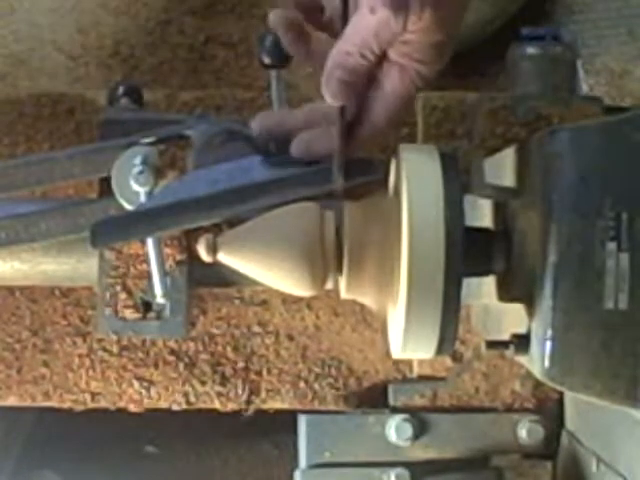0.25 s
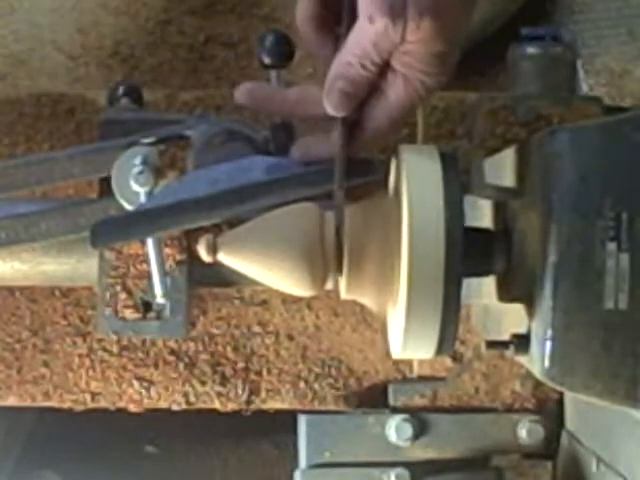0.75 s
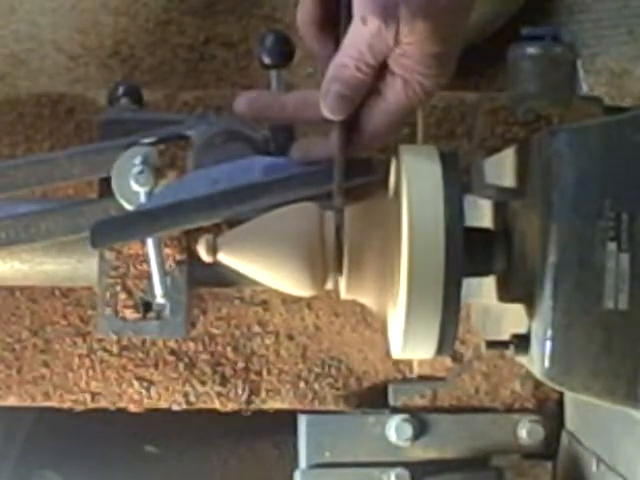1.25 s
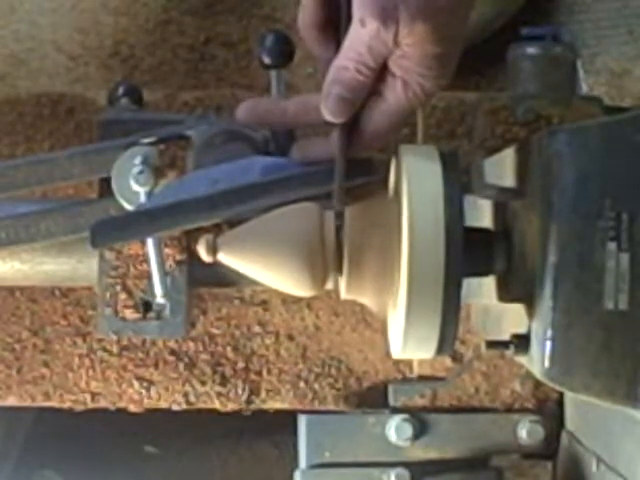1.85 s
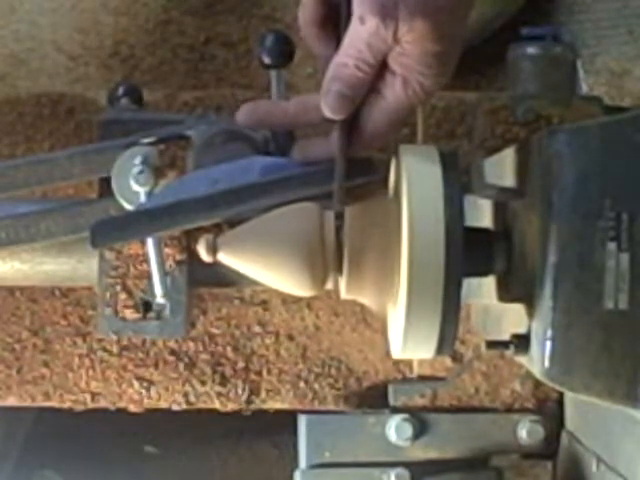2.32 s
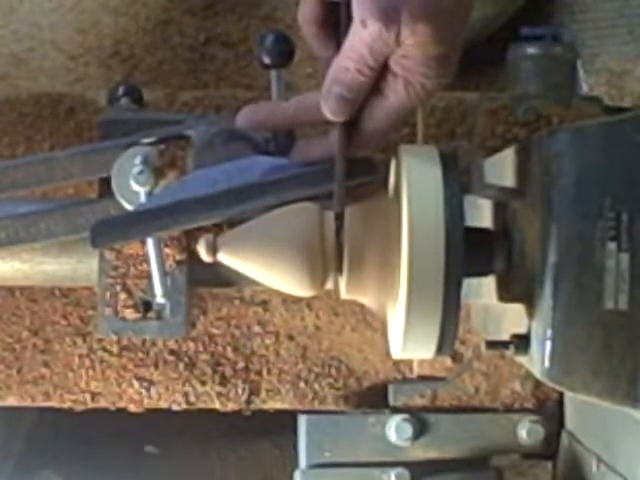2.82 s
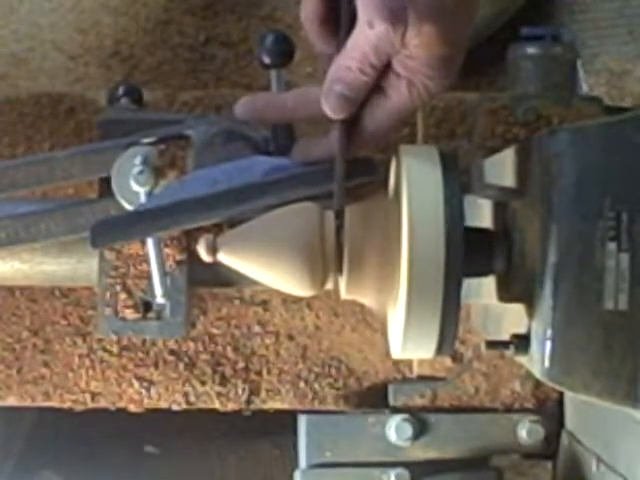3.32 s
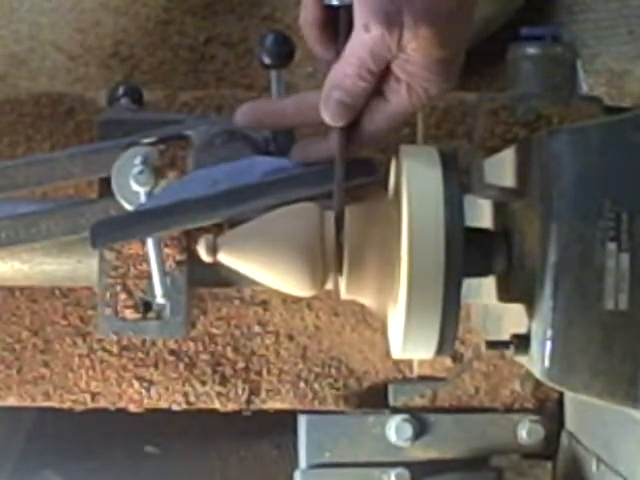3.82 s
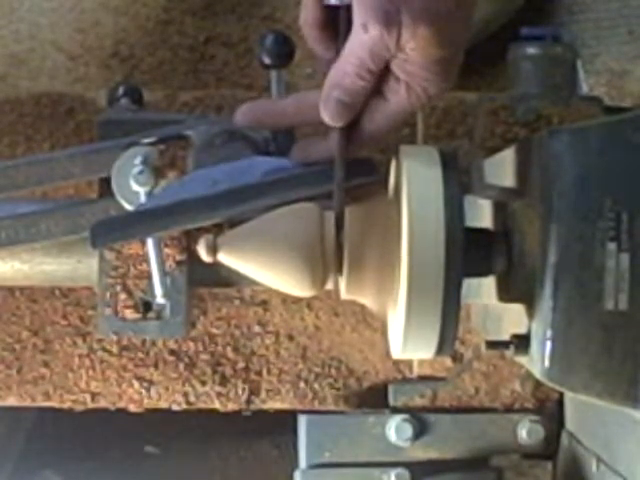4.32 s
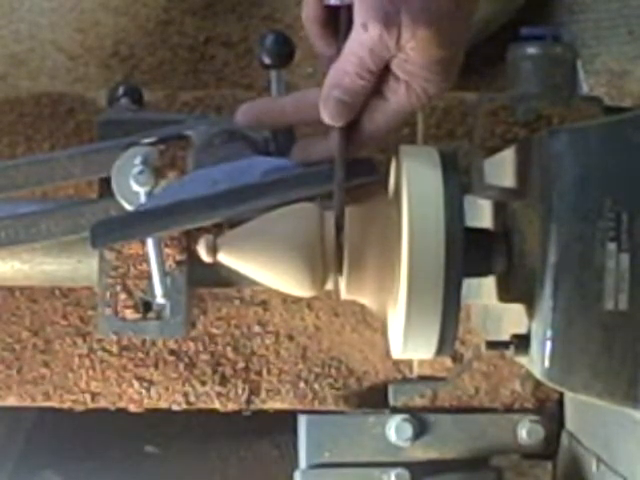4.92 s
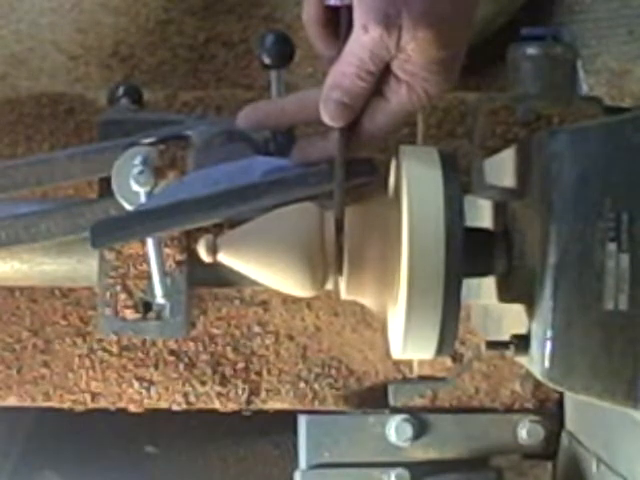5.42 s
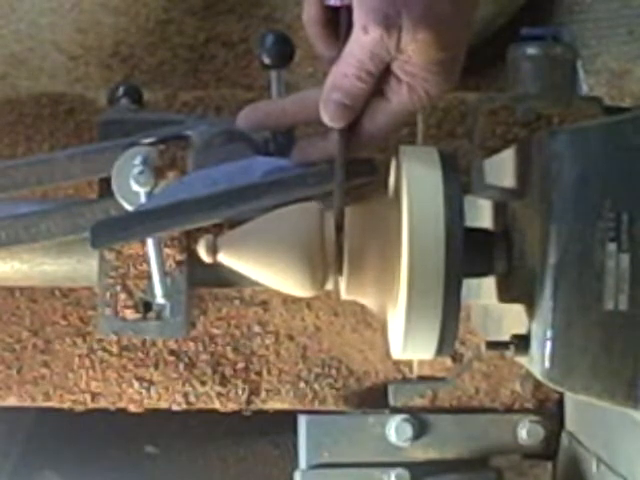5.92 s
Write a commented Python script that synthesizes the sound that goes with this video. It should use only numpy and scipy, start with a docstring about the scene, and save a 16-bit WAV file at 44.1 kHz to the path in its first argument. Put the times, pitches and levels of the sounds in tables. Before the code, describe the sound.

A lathe motor throbs several times for each lap of its belt, over soft mechanical rumble. A cutting edge touches the wood, skips, then tears fibres in a harsh rapid-fluttering hiss with metallic ringing. The scrape falls to a light rub for a moment, then returns as a sustained rasp with strengthening low growl and shudder. Small workshop, nearby narrow-band microphone, mono.

```python
"""In a small workshop a belt-driven wood lathe runs; its motor hums and throbs with each lap of the belt.
A thin parting tool is fed into the spinning wood, eased off for a moment, then fed in deeper.
The edge meets nearly the same grain on every turn, so filtered noise that almost repeats makes the hiss
flutter at the spindle rate, and tones at multiples of that rate make the growl. The blade also rings and squeaks."""
import sys
import numpy as np
from scipy import signal
from scipy.fft import rfft, irfft, next_fast_len
from scipy.io import wavfile
from scipy.ndimage import map_coordinates

SR = 44100
rng = np.random.default_rng(int(sys.argv[2]) if len(sys.argv) > 2 else 0)


def store_pcm(level_fs):
    """Save levels as 16-bit WAV."""
    pcm = np.round(np.clip(level_fs, -1, 1) * 32767).astype(np.int16)
    wavfile.write(sys.argv[1], SR, np.atleast_2d(pcm).T)


N = 271656


def from_db(db):
    """Turn decibels into gain."""
    return 10 ** (np.asarray(db) / 20)


def rms_one(x):
    """Scale to unit power."""
    return x / np.sqrt(np.mean(x ** 2) + 1e-20)


def in_time(rows):
    """Make one curve per column after the time, joined by straight lines."""
    s, *columns = np.transpose(rows)
    return [np.interp(np.arange(N) / SR, s, column) for column in columns]


def drift(rate_hz):
    """Slow random wandering with a spread of one, made by smoothing noise."""
    step = 40   # samples between the slow values
    pole = np.exp(-2 * np.pi * rate_hz * step / SR)
    noise = rng.standard_normal(N // step + 2002)
    slow = signal.lfilter([1], [1, -2 * pole, pole * pole], noise)[2000:]   # drop the filter's start-up
    return np.interp(np.arange(N) / step, np.arange(len(slow)), rms_one(slow))


def coloured(x, spectrum, resonances=()):
    """Filter x by a smooth spectrum with resonant peaks or dips on it; unit power."""
    size = next_fast_len(N + 4096)
    hz = np.maximum(np.fft.rfftfreq(size, 1 / SR), 1)
    points, levels = np.transpose(spectrum)
    db = np.interp(np.log(hz), np.log(points), levels, left=-np.inf, right=-np.inf)
    for centre, width, lift in resonances:
        db = db + lift / (1 + (2 * (hz - centre) / width) ** 2)
    return rms_one(irfft(rfft(x, size) * from_db(db), size)[:N])


def ringing(hz, width_hz):
    """A randomly shaken resonance: a tone whose strength and phase wander."""
    phase = 2 * np.pi * np.cumsum(hz * np.ones(N)) / SR
    return rms_one(drift(width_hz) * np.cos(phase) + drift(width_hz) * np.sin(phase))


def surface(turns, memory, count):
    """Roughness at count places round a turning part; each turn keeps a share of the last."""
    keep = np.clip(memory, 0, .995)
    laps = rng.standard_normal((int(turns[-1]) + 2, count))
    for k in range(1, len(laps)):
        laps[k] = keep * laps[k - 1] + np.sqrt(1 - keep ** 2) * laps[k]
    return rms_one(map_coordinates(laps.ravel(), [turns * count], order=3, mode="nearest"))


def spindle_tone(turns, multiple, unsteady):
    """A tone at a multiple of the spindle rate; it changes as the wood is pared away."""
    phase = 2 * np.pi * (multiple * turns + rng.random())
    return (1 + unsteady * drift(1.65)) * np.cos(phase) + unsteady * drift(1.2) * np.sin(phase)


# the belt laps steadily, and slips back once as the first cut bites hardest
BELT_LAPS_PER_S, BELT_JOINT_S = 5.967, -.0095
SLIP_FROM_S, SLIP_TO_S, SLIP_LAPS = 2.35, 2.8, .67


def belt_laps():
    """Laps of the belt, counted from a passing of its joint."""
    t = np.arange(N) / SR
    slipped = np.interp(t, [SLIP_FROM_S, SLIP_TO_S], [0, SLIP_LAPS])
    return BELT_LAPS_PER_S * (t - BELT_JOINT_S) - slipped


MAINS_HZ = 60
STEADY_HUM_DB = -28   # fourth multiple of the mains, with the belt fully taut
TUG_SPREAD_DB = 1.65   # chance difference between tugs
# weaker magnetic hum and belt sidebands: (multiple of the mains, belt order, mean level [dB rms])
HUM = [(1, 0, -61), (2, -3, -45), (2, 0, -47.5), (2, 3, -52.5), (4, -8, -45), (4, -2, -53.5), (4, 2, -44),
       (4, 3, -52)]
# stiff places in the belt tug on the motor on every lap: (place in the lap [0-1], typical hum level [dB])
TUGS = [(.318, -21), (.679, -23.6), (0.977, -24)]


def motor(turns, slack, waver=0.082, surge_s=0.038, surge_hz=237):
    """Hum at multiples of the mains; a slack belt breaks it into surges, a taut one lets it run evenly."""
    t, laps = np.arange(N) / SR, belt_laps()
    hum_hz = 4 * MAINS_HZ
    hum = (1 - slack) * from_db(STEADY_HUM_DB) * np.cos(2 * np.pi * hum_hz * t)
    for multiple, belt_order, db in HUM:
        level = from_db(db) * (1 + waver * drift(1.8))
        hum = hum + level * np.cos(2 * np.pi * (multiple * MAINS_HZ * t + belt_order * laps))
    # a tug swings the housing, tuned just under the hum; it is in step with the hum at the top of the surge
    for lap in range(int(laps[-1]) + 1):
        for place, db in TUGS:
            s = np.interp(lap + place, laps, t, right=np.inf)
            near = np.abs(t - s) < surge_s
            lag = t[near] - s
            strength = from_db(db + TUG_SPREAD_DB * rng.standard_normal())
            swell = strength * np.cos(np.pi / 2 * lag / surge_s) ** 2
            hum[near] += slack[near] * swell * np.cos(2 * np.pi * (hum_hz * s + surge_hz * lag))
    return np.sqrt(2) * hum   # levels are rms


# colour of the belt rumble: (frequency [Hz], relative level [dB per Hz])
RUMBLE = [(12, -68), (20, -23), (75, -23), (107, -21.5), (166, -22), (238, -12.5), (270, -18.5), (576, -26),
          (630, -25), (690, -20), (728, -30.5), (797, -28.5), (1500, -43.5), (1950, -68), (3300, -120)]
# colour of the bearing hiss: (frequency [Hz], relative level [dB per Hz])
BEARINGS = [(590, -35), (1000, -6.5), (1100, -7.5), (1200, -3.5), (1600, -11), (2500, -6.5), (3200, -10.5),
            (4100, -2), (4970, -5), (5710, -10.5), (6790, -6.5), (7860, -19.5), (8620, -29), (8940, -45.5),
            (11600, -72), (19700, -120)]
# headstock and motor housing resonances: (frequency [Hz], width [Hz], level [dB rms])
HOUSING = [(233.5, 27, -34.5), (440, 27, -58), (587, 12, -50.5), (691, 20, -49.5), (801, 18, -51.5),
           (7600, 40, -61.5), (8370, 40, -76)]


def headstock(turns, rumble_db=-38, bearings_db=-39.5, flutter_db=1.0):
    """Belt rumble and bearing hiss from filtered noise, and the ringing of the castings."""
    dip = (226.4, 43, -14.0)   # Hz, width Hz, dB
    rumble = from_db(rumble_db) * coloured(rng.standard_normal(N), RUMBLE, [dip])
    flutter = from_db(flutter_db * surface(turns, memory=0.41, count=12))
    rolling = rng.standard_normal(N) * flutter
    bearings = from_db(bearings_db) * coloured(rolling, BEARINGS)
    castings = sum(from_db(db) * ringing(hz, width / 2) for hz, width, db in HOUSING)
    return rumble + bearings + castings


# the blade sings faintly in the shallow cut, shakily until it settles on one note:
# (time [s], pitch [Hz], level [dB], shaky part as a multiple of the held part)
SING = [(1.52, 2500, -65, 3), (1.57, 2300, -44, 3), (1.66, 1650, -39, 2), (2.0, 1660, -42, 1.5),
        (2.4, 1770, -44, .8), (2.75, 1783, -40, .5), (3.03, 1788, -36.5, .5), (3.12, 1790, -68, .5)]


def squeak(turns, touching, end_grain_db=7):
    """The blade squeaks each time end grain passes the edge, twice a turn: a held note with a shaky part."""
    hz, db, shaky = in_time(SING)
    passes = rms_one(from_db(end_grain_db * np.cos(2 * np.pi * 2 * turns)))
    held = np.sqrt(2) * np.cos(2 * np.pi * np.cumsum(hz) / SR)
    note = (held + shaky * ringing(hz, width_hz=26)) / np.hypot(1, shaky)
    return touching * from_db(db) * passes * note


# the blade rings up as the shallow cut bears harder: (time [s], level [dB])
RING_UP = [(1.5, -78), (1.75, -37), (2.05, -38), (2.3, -24), (2.7, -30.5), (2.9, -28), (3.02, -22.5),
           (3.15, -65)]
# the modes that ring up: (multiple of the spindle rate, relative level [dB])
RING_MODES = [(99, -16), (132, -12), (169, -4), (195, -13), (209, -6)]


def blade_ring(turns, speed, locked_db=0, loose_db=-2):
    """Under pressure the blade rings: partly in step with the wood, partly at random."""
    ring_db, = in_time(RING_UP)
    ring = 0
    for multiple, db in RING_MODES:
        locked = from_db(locked_db) * spindle_tone(turns, multiple, unsteady=0.31)
        loose = from_db(loose_db) * ringing(multiple * speed, width_hz=29)
        ring = ring + from_db(db) * (locked + loose)
    return from_db(ring_db) * ring


FULL_SHUDDER_DB = -33   # shudder level at full cut
# the thrum follows the shudder: level at full cut, dB per dB
THRUM_DB, THRUM_FOLLOWS = -28.5, 1.35
# the growl is mostly tone, with some loose wood noise
CHATTER_WIDTH_HZ, TONE_DB, WOOD_DB = 28, -.3, -6.5
# force on the workpiece, before the trims: (time [s], growl level [dB], shudder level [dB])
LOAD = [(1.52, -44, -47), (1.58, -55, -62), (1.77, -40, -43.5), (1.88, -37, -49), (2.46, -29.5, -34),
        (3.01, -33, -41), (3.19, -55, -57), (3.38, -39.5, -48.5), (3.48, -47, -60.5), (3.62, -32, -39),
        (4.7, -27.5, -37), (5.09, -30, -34), (6.09, -26.5, -33), (6.1, -28, -33.5)]
# the chatter resonance shifts with the tool's grip on the wood: (time [s], frequency [Hz], lift [dB])
CHATTER_PITCH = [(3.0, 537, 9), (3.6, 540, 6), (4.0, 574, 10), (4.8, 592, 10), (5.05, 603, 6),
                 (5.3, 535, 6), (5.6, 535, 7), (5.9, 600, 3), (6.16, 535, 6)]
# chatter of the workpiece against the edge: (multiple of the spindle rate, relative level [dB])
GROWL = [(17, -13), (18, -15), (19, -14), (20, -10), (21, -13), (22, 0), (23, -5), (24, -3), (25, -8),
         (26, -16), (27, -8), (28, -8), (32, -13), (36, -14), (40, -16), (42, -16)]
# slow flexing of the workpiece: (multiple of the spindle rate, relative level [dB])
THRUM = [(4, -15.5), (8, -1), (10, -3.5)]
# fast shudder of the workpiece: (multiple of the spindle rate, relative level [dB])
SHUDDER = [(11, -12), (13, -14.5), (14, -5.5)]
# colour of the loose wood noise: (frequency [Hz], relative level [dB per Hz])
WOOD = [(150, -23), (200, -4.5), (280, -3), (380, -9.5), (470, -0.5), (560, 6.5), (650, 2.5), (760, -10.5),
        (950, -21.5), (1200, -21)]


def flexing_tones(turns, orders):
    """The wood flexes at several multiples of the spindle rate; their sum has unit power."""
    return rms_one(sum(from_db(db) * spindle_tone(turns, multiple, unsteady=0.11) for multiple, db in orders))


def workpiece(turns, speed, touching, growl_trim_db=3.0, shudder_trim_db=0.5):
    """The uneven cutting force shakes wood and chuck at multiples of the spindle rate."""
    growl_db, shudder_db = in_time(LOAD)
    thrum_db = THRUM_DB + THRUM_FOLLOWS * (shudder_db - FULL_SHUDDER_DB)
    centre_hz, lift_db = in_time(CHATTER_PITCH)
    growl, power = 0, 0
    for multiple, db in GROWL:
        near = 1 / (1 + (2 * (multiple * speed - centre_hz) / CHATTER_WIDTH_HZ) ** 2)
        gain = from_db(db + lift_db * near)   # harmonics near the resonance are lifted
        growl = growl + gain * spindle_tone(turns, multiple, unsteady=0.14)
        power = power + gain ** 2
    thrum = from_db(thrum_db) * flexing_tones(turns, THRUM)
    shudder = from_db(shudder_db + shudder_trim_db) * flexing_tones(turns, SHUDDER)
    wood = coloured(surface(turns, memory=0.25, count=200), WOOD)
    chatter = from_db(TONE_DB) * growl / np.sqrt(power) + from_db(WOOD_DB) * wood
    return touching * (from_db(growl_db + growl_trim_db) * chatter + thrum + shudder)


def edge_bite(turns, grain_db=.9, end_grain_db=.75, fibre_db=1.4, belt_db=.8, grip_db=.3):
    """How hard the edge bites: hard and soft grain come round on every turn, belt and hand add unrest."""
    grain = grain_db * surface(turns, memory=0.89, count=10)
    end_grain = end_grain_db * np.cos(2 * np.pi * 2 * turns)
    fibres = fibre_db * surface(turns, memory=.88, count=70)
    tug = belt_db * np.cos(2 * np.pi * 3 * belt_laps())
    return rms_one(from_db(grain + end_grain + fibres + tug + grip_db * drift(23)))


FULL_FEED_DB = -20   # hiss level at full cut
# below this feed the edge begins to rub instead of cutting; this much lower it only rubs
CUTTING_DB, RUBBING_RANGE_DB = -20, 11
# the rasp follows the feed and grows in the groove: level at full cut, dB per dB, dB more when fully buried
RASP_DB, RASP_FOLLOWS, RASP_BURIED_DB = -33, 0.64, 2.5
# how hard the tool is fed in, as the level of its hiss before a small trim: (time [s], level [dB])
FEED = [(1.52, -28.5), (1.66, -28.5), (1.74, -19.5), (2.04, -21), (2.2, -20), (2.45, -19.0), (2.76, -21),
        (2.88, -19), (3.02, -21), (3.15, -39.0), (3.24, -34.0), (3.5, -33), (3.56, -24.5), (3.8, -26.5),
        (3.86, -23.5), (4.85, -21), (5.45, -20.0), (6.16, -21)]
# the blade sinks into its groove during the second push: (time [s], buried share [0-1])
GROOVE = [(3.05, 0), (3.85, 0.83)]
# colour of the coarse rasp: (frequency [Hz], relative level [dB per Hz])
RASP = [(470, -32.5), (800, -5.5), (822, -6.5), (1000, -5), (1450, -9), (1560, -3.5), (1730, -2),
        (2120, -6.5), (2350, -0.5), (2720, -11), (3000, -10.5), (3900, -25.5), (6600, -120)]
# colours of the hiss, in a shallow cut, in a deep cut and when only rubbing:
# each (frequency [Hz], relative level [dB per Hz])
SHALLOW_HISS = [(1590, -34), (2700, -16), (3040, -10), (3150, -5.5), (3420, -7), (3990, 0), (4240, -3.5),
                (4350, -2.5), (5150, -2), (5500, -8), (6990, -9), (8090, -24.5), (8940, -42),
                (11600, -70.5), (19700, -120)]
DEEP_HISS = [(1590, -32), (2700, -20), (2940, -23), (3170, -5.5), (3380, -10), (3670, -3), (3990, -2.5),
             (4320, -5.5), (4930, -6.5), (5700, -9.5), (7100, -9.5), (7930, -20.5), (8940, -40),
             (11600, -62.5), (19700, -120)]
RUB_HISS = [(1590, -51), (2700, -14), (3080, -11.5), (3330, -2), (3700, -0.5), (4320, -4), (4830, -1),
            (5470, -11), (6140, -8), (6990, -14.5), (7970, -24.5), (8940, -44.5), (11600, -71),
            (19700, -120)]
# resonances of the blade, and dips from reflections off nearby surfaces, before scaling:
# (frequency [Hz], width [Hz], lift [dB])
BLADE = [(1620, 40, 3.5), (2020, 25, 4), (2415, 50, 5), (3228, 35, 5), (3330, 60, -3), (3555, 30, 4),
         (3622, 30, 3), (3838, 30, 4), (4130, 35, 5), (4450, 70, -5), (4560, 40, 2), (4777, 35, 4),
         (4890, 50, -3), (4970, 30, 3), (5093, 40, 4.5)]


def shaving(turns, speed, touching, hiss_trim_db=-0.05):
    """Fibres tear at the edge and ring the blade: wood roughness filtered into hiss and rasp."""
    hiss_db, = in_time(FEED)
    depth, = np.clip(in_time(GROOVE), 0, 1)
    rasp_db = RASP_DB + RASP_FOLLOWS * (hiss_db - FULL_FEED_DB) + RASP_BURIED_DB * depth
    rubbing = np.clip((CUTTING_DB - hiss_db) / RUBBING_RANGE_DB, 0, 1)
    bite = edge_bite(turns)
    tearing = bite * surface(turns, memory=0.56, count=1800)   # fine roughness is soon cut away
    coarse = bite * surface(turns, memory=0.69, count=500)
    # the walls of the groove damp the blade's hiss as it sinks in;
    # in a light rub the coarse rasp rings more freely, while the fine hiss stays damped
    damped, pressed, free = (np.array(BLADE) * [1, 1, share] for share in (.8, 1.05, 1.5))
    shallow = coloured(tearing, SHALLOW_HISS, pressed)
    deep = coloured(tearing, DEEP_HISS, damped)
    cut = (1 - depth) * shallow + depth * deep
    hiss = (1 - rubbing) * cut + rubbing * coloured(tearing, RUB_HISS, damped)
    rasp = (1 - rubbing) * coloured(coarse, RASP, damped) + rubbing * coloured(coarse, RASP, free)
    scrape = from_db(hiss_db + hiss_trim_db) * hiss + from_db(rasp_db) * rasp
    return touching * (scrape + bite * blade_ring(turns, speed))


# the spindle slows a little under load: idle rate, and the sag at full shudder
IDLE_TURNS_PER_S, SAG_TURNS_PER_S = 24.7, .36
TAUT_DB = -33.5   # LOAD growl level that pulls half of the slack out of the belt
# the edge grazes the wood, lifts off and settles on it: (time [s], contact [0-1])
FIRST_TOUCH = [(1.435, 0), (1.447, 1), (1.468, 1), (1.48, .3), (1.497, .3), (1.501, 1)]


def scene():
    """The running lathe and the cut; the load slows the spindle and tightens the belt."""
    touching, = in_time(FIRST_TOUCH)
    growl_db, shudder_db = in_time(LOAD)
    speed = IDLE_TURNS_PER_S - SAG_TURNS_PER_S * touching * from_db(shudder_db - FULL_SHUDDER_DB)
    slack = 1 / (1 + touching * from_db(growl_db - TAUT_DB))
    turns = np.cumsum(speed) / SR
    machine = motor(turns, slack) + headstock(turns)
    cut = squeak(turns, touching) + workpiece(turns, speed, touching) + shaving(turns, speed, touching)
    return (machine + cut)[None]


def record(dry):
    """A small microphone with a narrow band: a steep filter removes the treble above 8900 Hz."""
    low_pass = signal.ellip(10, .1, 80, 8900, fs=SR, output="sos")   # order, ripple dB, rejection dB, Hz
    return signal.sosfilt(low_pass, dry)


dry = scene()
out = record(dry)
store_pcm(out)
```